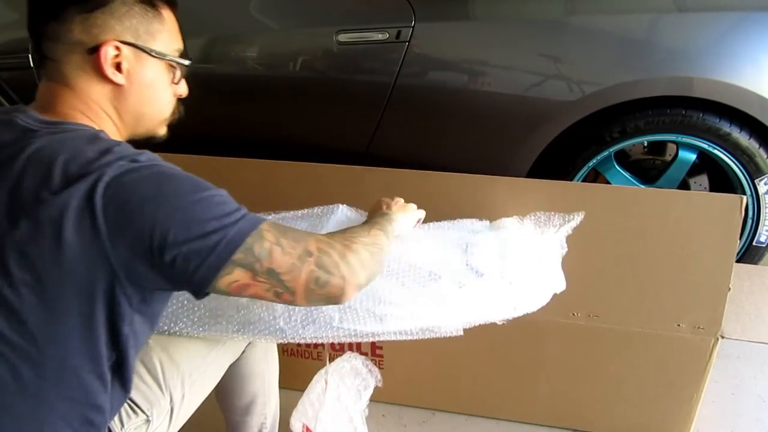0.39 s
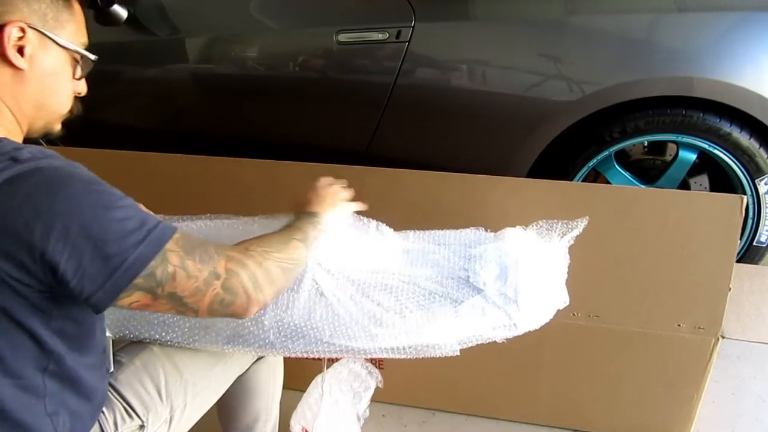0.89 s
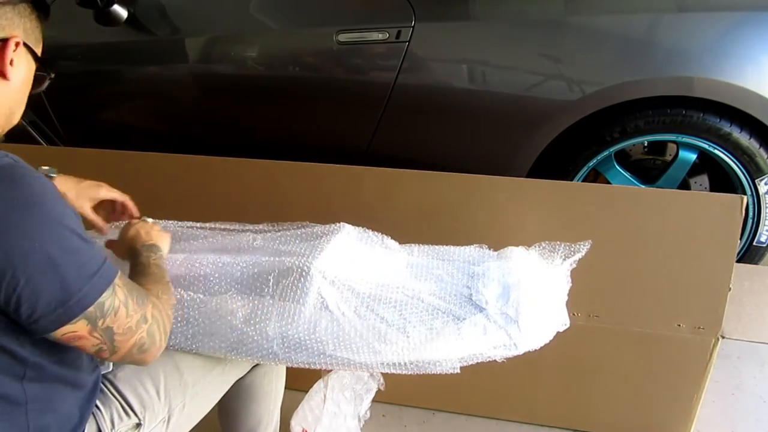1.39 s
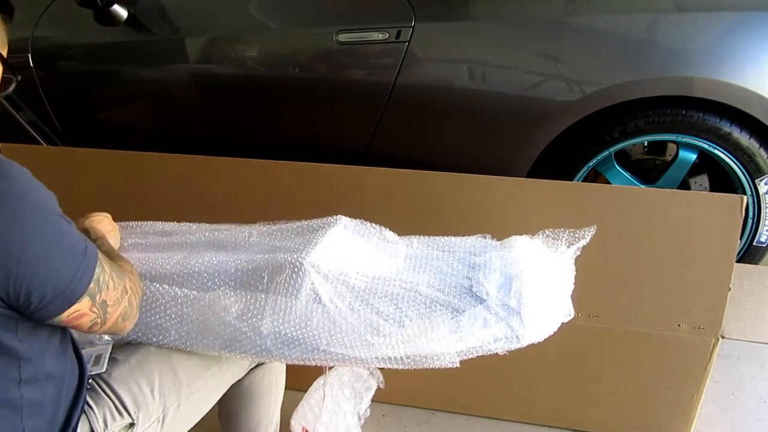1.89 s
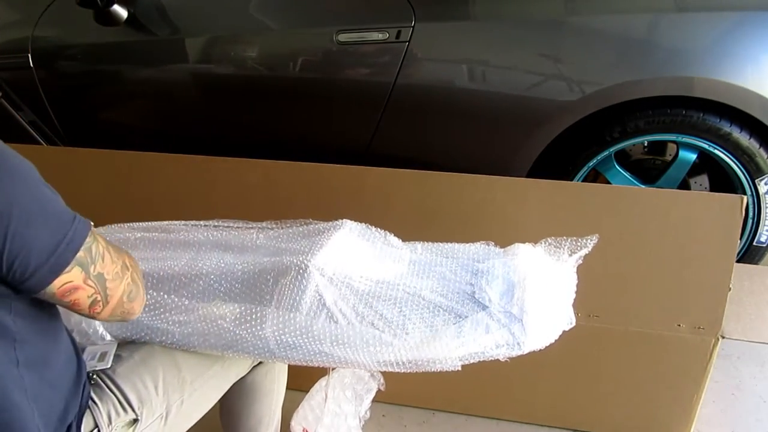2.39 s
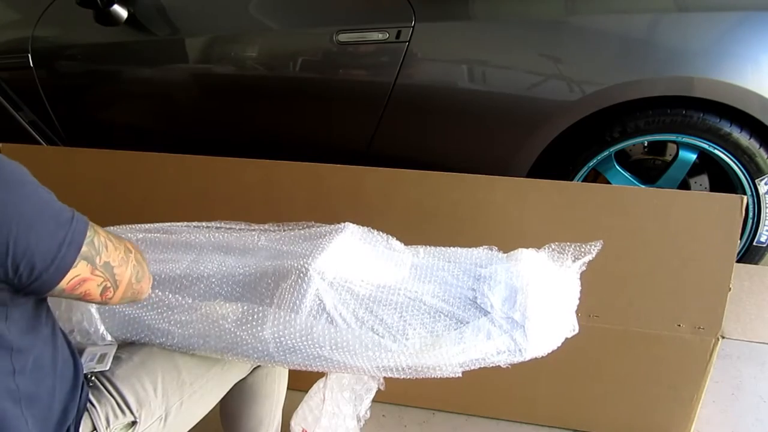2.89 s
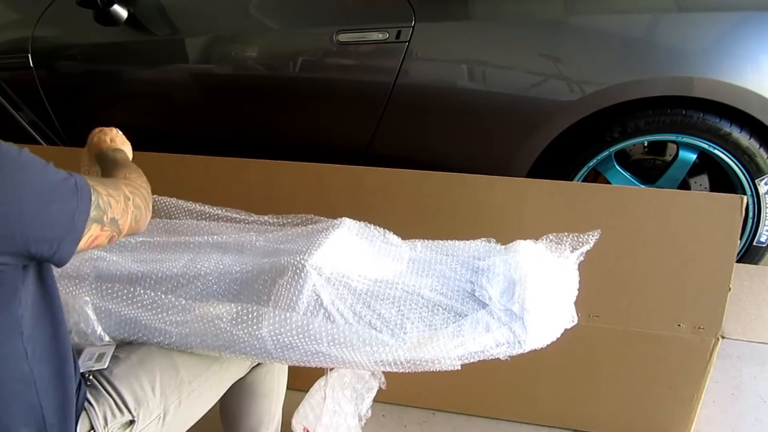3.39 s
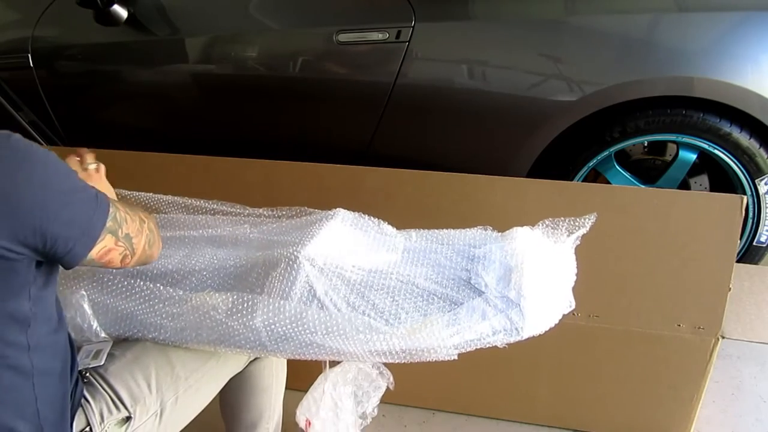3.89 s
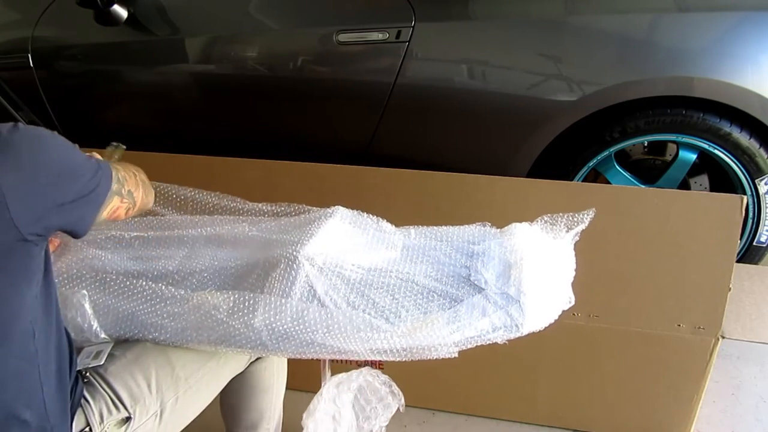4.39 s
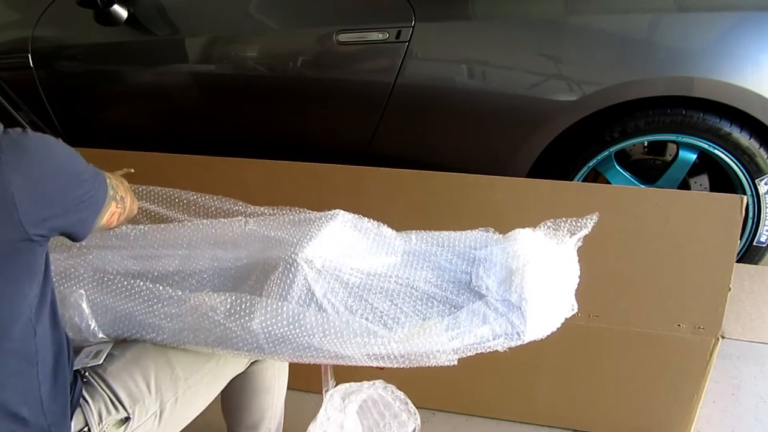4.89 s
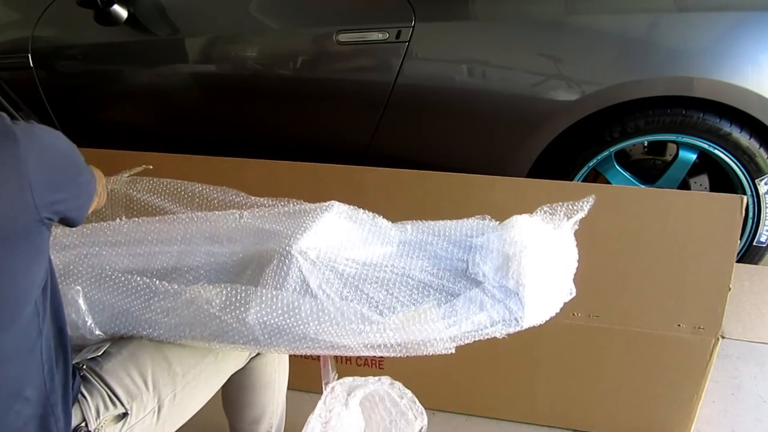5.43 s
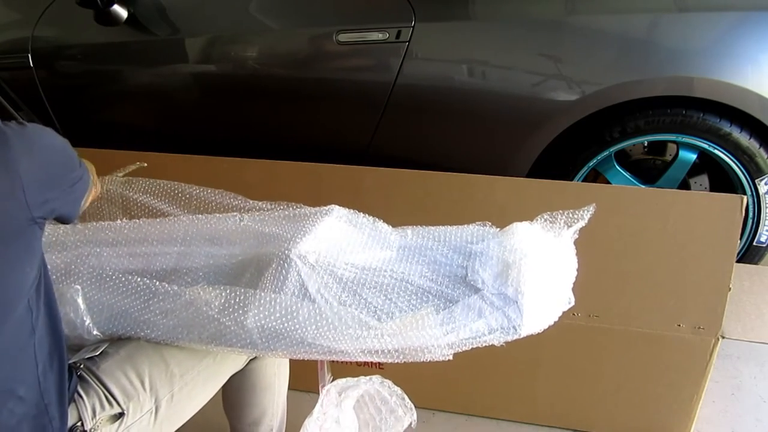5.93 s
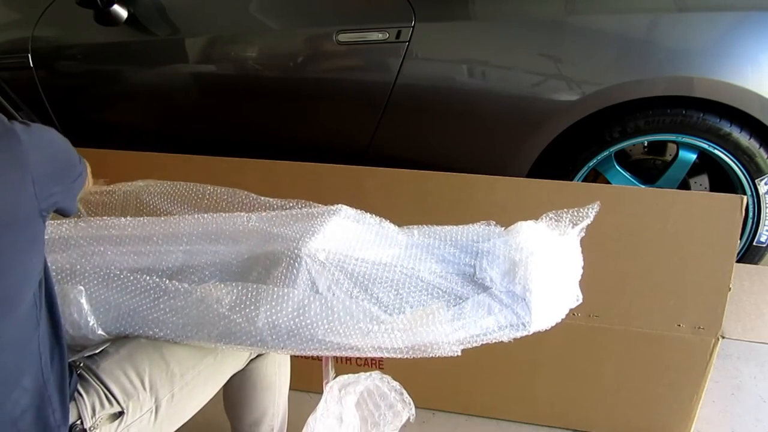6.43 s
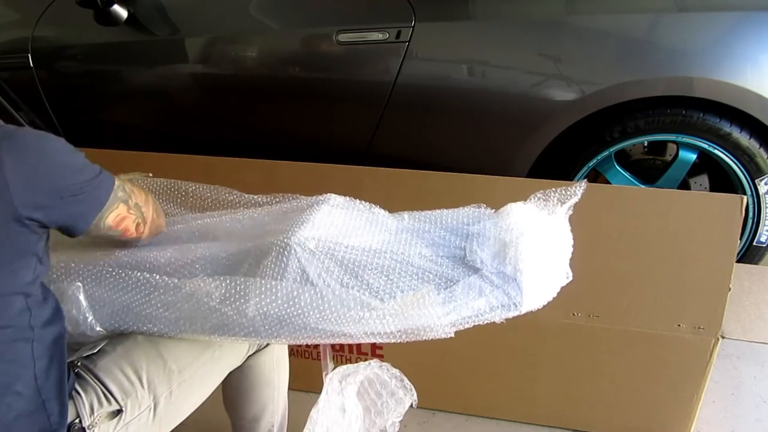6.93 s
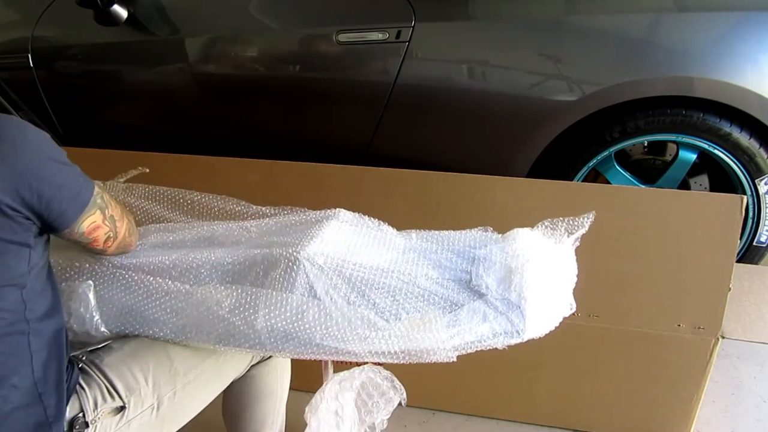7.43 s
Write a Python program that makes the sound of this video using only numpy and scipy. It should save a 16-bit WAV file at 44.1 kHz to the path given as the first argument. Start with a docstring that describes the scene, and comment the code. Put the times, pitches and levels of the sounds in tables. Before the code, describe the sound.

Plastic wrap rustles in light pulls, goes quieter, then hard tugs crack sharply and boom against a large hollow panel in a bare garage.

```python
"""Bubble wrap is pulled off a large hollow plastic part in a bare garage, over a faint rumble and low hum.
It starts with light pulls: swarms of tiny clicks from buckling folds, with a few snaps and bumps.
After a quieter spell, hard pulls near 3, 4.3, 5.2 and 6 to 6.5 s add loud snaps, booms and short creaks;
lighter pulls end it. Clicks ring at the pitch of their fold, the part rings in a few fixed notes,
and dense reflections let every sound die away in under half a second."""
import sys
import numpy as np
from scipy import signal
from scipy.fft import rfft, irfft, next_fast_len
from scipy.io import wavfile

SR = 44100
rng = np.random.default_rng(int(sys.argv[2]) if len(sys.argv) > 2 else 0)


def bounce(signal):
    """Save signal as a 16-bit WAV file at the path given by the first command-line argument."""
    frames = np.transpose(np.atleast_2d(signal))
    limited = np.clip(frames, -1, 1)
    pcm = np.round(limited * 32767).astype(np.int16)
    wavfile.write(sys.argv[1], SR, pcm)


def level_to_linear(level):
    """Convert decibel levels to linear amplitude factors, elementwise."""
    exponent = np.asarray(level, float) / 20
    return 10 ** exponent


N = 332955   # length in samples
HOP = 40   # samples between the points of a slow curve

# rumble from outside, only its tone colour: pitch_hz, level_per_hertz_db
RUMBLE_COLOUR = [(20, -3), (40, -8), (70, -1), (128, 0), (250, 0), (500, -5), (1500, -17.5), (5000, -18),
                 (15000, -58)]
# a low hum that comes and goes: time_s, rms_level_db
HUM_LEVEL = [(0, -75), (.25, -57), (1.22, -60), (1.45, -50), (1.75, -50), (2.0, -59), (3.7, -58),
             (4.2, -65), (7.55, -61)]
# how long the garage rings on: pitch_hz, time_to_fall_60_db_s
GARAGE_RING = [(200, 0.39), (600, 0.46), (1800, 0.34), (5000, 0.45), (12000, 0.26)]
# notes of the hollow part: pitch_hz, level_db, time_to_fall_60_db_s
PART_NOTES = [(252.5, -12, 0.098), (427, -11, 0.073), (640, -3.5, 0.016), (840, -14, 0.1),
              (1200, -17, 0.013), (1730, 4.5, 0.0048)]
# hand or film bumping the part: start_s, push_strength_db, hardness_0_to_1
BUMPS = [(0.471, -25.5, 0.9), (0.567, -34, 0.3), (0.826, -26, 0.48), (1.732, -26, 1), (3.118, -23, 0.61),
         (3.25, -22, 1), (3.694, -42, 0.55), (3.868, -17, 0.8), (3.951, -32, 0.3), (4.339, -12.5, 0.85),
         (4.415, -11, 0.45), (5.182, -5.5, 0.56), (5.614, -28.5, 0.56), (5.658, -24, 0.32),
         (6.028, -26.5, 0.57), (6.171, -12.5, 0.9), (6.447, -22, 0.12)]
# film sticking and slipping on the part: start_s, length_s, slips_per_s, strongest_slip_db
STICK_SLIPS = [(3.161, 0.11, 385, -21.5), (5.02, 0.057, 268, -24.5), (5.069, 0.015, 262, -21)]
# slack film shifting between strokes: time_s, rustle_rms_db, commonest_fold_hz
SLACK_FILM = [(0, -38, 1990), (.3, -51.5, 2200), (.38, -54, 2300), (.6, -39.5, 2220), (1.25, -38.5, 2820),
              (1.7, -42, 2130), (2.4, -43, 2180), (2.75, -48, 2295), (3.6, -52, 2140), (4.1, -49, 2210),
              (4.55, -38, 2167), (4.9, -46, 1992), (5.55, -45, 2504), (5.92, -47.5, 2210),
              (6.62, -41.5, 2500), (6.9, -40.5, 2820), (7.1, -40, 1996), (7.55, -43, 2620)]
# strokes of the hands: climb_start_s, climb_end_s, fall_start_s, level_at_climb_end_before_any_fall_db,
# commonest_fold_at_climb_end_hz
HAND_STROKES = [(0, 0.09, .19, -37, 3500), (.19, 0.218, 0.27, -36.5, 2180), (0.386, .47, .5, -31.5, 1920),
                (0.496, 0.536, 0.51, -36, 1920), (0.587, 0.675, 0.838, -35.5, 2630),
                (0.967, 1.136, 1.134, -33, 2270), (1.242, 1.326, 1.44, -35, 2020),
                (1.424, 1.48, 1.46, -31.5, 2200), (2.027, 2.064, 2.31, -39.5, 3460),
                (2.498, 2.53, 2.546, -42, 2000), (2.897, 3.07, 3.238, -21, 2310),
                (3.684, 3.766, 3.85, -45, 1910), (3.865, 3.859, 3.96, -40, 750),
                (4.226, 4.365, 4.435, -22.5, 1970), (4.518, 4.594, 4.67, -37, 3240),
                (4.861, 4.893, 4.98, -48, 1660), (5.085, 5.15, 5.243, -21, 1720),
                (5.42, 5.444, 5.49, -35.5, 2804), (5.604, 5.684, 5.69, -43.5, 1890),
                (5.956, 6.051, 6.16, -26, 1620), (6.143, 6.164, 6.215, -23, 1698),
                (6.34, 6.37, 6.21, -32, 2360), (6.4, 6.445, 6.49, -27, 1770), (6.683, 6.7, 6.61, -30, 4370),
                (7.17, 7.18, 7.23, -37, 2800), (7.368, 7.385, 6.2, -37, 4270),
                (7.49, 7.517, 7.6, -35, 1970)]
# tone colour of the buckling film, before it is tilted by the pull: pitch_hz, level_per_hertz_db
FILM_COLOUR = [(88, -43), (150, -18), (208, -2.5), (258, -4.5), (410, 0.5), (488, -7.5), (790, 2),
               (2520, -0.5), (8510, -6.5), (12800, -36), (15200, 10.5)]
# a fold snapping and the clicks it sets off, before the last filter:
# start_s, crack_peak_db, ring_hz, run_rms_relative_to_crack_db
FOLD_SNAPS = [(0.0166, -20, 1540, -16), (0.0613, -21, 2030, -17), (0.093, -24, 4050, -13),
              (0.1306, -18.5, 3390, -13), (0.1594, -17, 2720, -21), (0.2383, -16, 2980, -23),
              (0.2974, -26, 2310, -30), (0.4168, -20.5, 3470, -14.5), (0.443, -17, 1520, -12.5),
              (0.4759, -11.5, 5530, -14.5), (0.487, -11, 1630, -14), (0.5353, -14, 1530, -14),
              (0.6983, -20, 1530, -17.5), (0.7722, -13, 7900, -15), (0.8234, -22, 1970, -18),
              (0.8921, -18, 1770, -23), (1.0036, -17.5, 1530, -14.5), (1.4018, -17.5, 1630, -16),
              (1.736, -21.5, 1230, -17), (1.7854, -26, 4000, -11), (1.8728, -24, 1290, -15),
              (2.1029, -19, 3250, -13), (2.14, -27, 3180, -22), (2.2822, -19, 5400, -16),
              (2.5357, -23.5, 1720, -14), (2.833, -14.5, 3300, -14), (2.8894, -15, 6620, -14.5),
              (2.9114, -7.5, 4520, -15.5), (2.9473, -6.5, 5350, -16.5), (2.9896, -4.5, 1890, -14),
              (3.048, -14, 1730, -16), (3.1194, -5.5, 1880, -11.5), (3.2444, -2.5, 2480, -16),
              (3.697, -24.5, 1280, -15), (3.7663, -23, 1920, -17), (3.9493, -25, 1340, -20),
              (4.2153, -14.5, 2340, -18), (4.2453, -11, 1970, -18), (4.2941, -15.5, 1970, -17.5),
              (4.3181, -4.5, 2520, -22.5), (4.3405, -1.5, 1310, -16.5), (4.4123, -4.5, 2660, -26),
              (4.6118, -19, 6700, -17), (4.6485, -12, 7300, -18), (5.1227, -11.5, 1390, -14),
              (5.1529, -3.5, 2230, -15.5), (5.1664, -6, 1600, -14), (5.1824, -8.5, 1130, -13),
              (5.4493, -23, 2970, -12), (5.66, -18.5, 1232, -14.5), (5.9848, -19.5, 1356, -15),
              (6.0297, -10.5, 1590, -14.5), (6.0542, -10, 1820, -14.5), (6.0892, -2, 1360, -16.5),
              (6.1708, -3, 1245, -18), (6.185, 0, 1240, -16.5), (6.3763, -12, 1620, -16.5),
              (6.4258, -13.5, 2796, -14.5), (6.4468, -4.5, 1660, -14.5), (6.7077, -9, 7274, -16),
              (6.7196, -12, 4300, -12.5), (6.7339, -12.5, 4250, -12), (6.9416, -28, 2441, -16),
              (7.1761, -19.5, 2760, -15), (7.1934, -19, 1690, -15), (7.3839, -24, 6009, -14),
              (7.5087, -21.5, 1360, -17)]

RUMBLE_DB = -53
HUM_HZ, HUM_RING_S = 127.3, 1.35 / 8.9   # pitch; time to fall 60 dB
SHAKE_DB = -26   # extra hum relative to the film, when a stroke shakes the part
GARAGE_DB = 0   # level of the reflections
JERK_DB = -5.5   # first jerk of the wall relative to the push
BUILD_DB, LET_GO_DB_PER_S = 18, 360   # climb from its start to its end; speed of the fall
SAG_OCTAVES_PER_S = 1.1   # folds grow coarser as a stroke goes on
USUAL_FOLD_HZ, USUAL_DB = 2300, -35   # the pull at which the tilts below start from their plain values
# coarse folds relative to the film colour; change per octave of commonest pitch; change per dB of effort
COARSE_DB, COARSE_DB_PER_OCTAVE, COARSE_FOLLOWS = 1, -8.5, 0.017
FINE_DB, FINE_DB_PER_OCTAVE, FINE_FOLLOWS = 3, -2.5, 0.018   # the same for fine folds
TAUT_SNAPS_PER_S, TAUT_DB = 50, -27   # chances for a snap; film level above which one happens
# crack relative to film; run relative to crack; spread of loudness and of pitch, either way
TAUT_CRACK_DB, TAUT_RUN_DB, TAUT_SPREAD_DB, TAUT_SPREAD_OCTAVES = 9, -11.5, 6, 0.47
RINGING_HZ, RUN_CYCLES = 5330, 11   # smaller folds ring clearer, fully from this pitch up; length of the ring


def rms_one(x):
    """Scale to rms 1."""
    return x / np.sqrt(np.mean(x ** 2) + 1e-20)


def in_time(rows):
    """Turn a table into curves, one value every HOP samples."""
    s, *columns = np.transpose(rows)
    return [np.interp(np.arange(0, N, HOP) / SR, s, column) for column in columns]


def fill(slow):
    """Go from one value every HOP samples to one a sample."""
    return np.interp(np.arange(N) / HOP, np.arange(len(slow)), slow)


def at_hz(points, hz):
    """Read a table on a log-frequency axis, because pitch is heard in ratios."""
    table = np.array(points)
    return np.interp(np.log(hz), np.log(table[:, 0]), table[:, 1])


def coloured(x, spectrum):
    """Give white noise the tone colour of a table, at rms 1."""
    hz = np.maximum(np.arange(len(x) // 2 + 1) * SR / len(x), 1)
    return rms_one(irfft(rfft(x) * level_to_linear(at_hz(spectrum, hz)), len(x)))


def drift(rate):
    """Slow random wandering around 0, rms 1, one value every HOP samples; rate in Hz."""
    r = np.exp(-2 * np.pi * HOP * rate / SR)
    noise = rng.standard_normal(len(range(0, N, HOP)) + 2000)
    return rms_one(signal.lfilter([1], [1, -2 * r, r * r], noise)[2000:])   # skip the settling


def ring(clicks, hz, t60):
    """A resonance: each unit click starts a cosine of height 1 that falls 60 dB in t60 seconds."""
    r, w = level_to_linear(-60 / (t60 * SR)), 2 * np.pi * hz / SR
    return signal.lfilter([1, -r * np.cos(w)], [1, -2 * r * np.cos(w), r * r], clicks + 1e-18)


def rumble():
    """Steady noise from outside, strongest in the lows."""
    noise = rng.standard_normal(next_fast_len(N))
    return level_to_linear(RUMBLE_DB) * coloured(noise, RUMBLE_COLOUR)[:N]


def hum(film_db):
    """Noise through a narrow resonance makes a wavering low note, stronger when strokes shake the part."""
    note = ring(rng.standard_normal(N), HUM_HZ, HUM_RING_S)
    level = np.hypot(level_to_linear(in_time(HUM_LEVEL)[0]), level_to_linear(film_db + SHAKE_DB))
    return fill(level) * rms_one(note)


def garage(x):
    """Dense reflections dying octave by octave; film sounds from ever new spots, each with its own pattern."""
    t, step, size = np.arange(SR * 6 // 10) / SR, 1024, 30000
    noise, tails = rng.standard_normal((2, 24, len(t))), 0   # 24 spots
    for k, low in enumerate(60 * 2 ** np.arange(8)):
        band = signal.butter(2, [low, min(2 * low, .45 * SR)], "band", fs=SR, output="sos")
        octave = signal.sosfilt(band, noise[k % 2])
        decay = level_to_linear(-60 * t / at_hz(GARAGE_RING, 1.16 * low))
        tails = tails + octave * decay * np.clip((t - .002) / 0.0034, 0, 1)   # first reflections after 2 ms
    spots = rfft(tails / np.sqrt(np.sum(tails ** 2, axis=1))[:, None], size)
    padded, out = np.pad(x, (step, 2 * step)), np.zeros(N + 2 * size)
    for i in range(0, N + step, step):
        piece = padded[i:i + 2 * step] * np.hanning(2 * step)   # overlapping pieces, one spot each
        out[i:i + size] += irfft(rfft(piece, size) * spots[rng.integers(24)], size)
    return level_to_linear(GARAGE_DB) * out[step:step + N]


def part(pushes):
    """Pushes set the notes of the hollow part ringing, neighbours in opposite phase."""
    return sum(level_to_linear(db) * (-1) ** k * ring(pushes, hz, t60) for k, (hz, db, t60) in enumerate(PART_NOTES))


def knocks():
    """A harder bump is a shorter push and reaches higher notes; the wall's first jerk is heard directly."""
    pushes, jerks = np.zeros((2, N + 400))
    for s, db, hard in BUMPS:
        push = np.hanning(round(SR * 0.0034 * 0.093 ** np.clip(hard, 0, 1)) + 2)
        start = round(s * SR)
        pushes[start:][:len(push)] += level_to_linear(db) * push / push.sum()
        jerks[start:][:len(push)] += level_to_linear(db + JERK_DB) * rms_one(np.gradient(push))
    return part(pushes[:N]) - jerks[:N]


def creaks():
    """Soft slips come nearly evenly, swell and fade, so the part hums a short note."""
    slips = np.zeros(N)
    for start, length, per_s, db in STICK_SLIPS:
        t = np.arange(0, length, 1 / per_s)
        uneven = rng.normal(0, 8.8, 60)[:len(t)]   # samples early or late
        at = ((start + t) * SR + uneven).astype(int)
        slips[at] = level_to_linear(db) * np.sin(np.pi * t / length)
    softened = signal.lfilter([.1], [1, -.93], slips)
    return part(softened)


def pulling():
    """Each stroke climbs and falls, some falling before the climb ends, a few too early to be heard."""
    t, (slack_db, slack_hz) = np.arange(0, N, HOP) / SR, in_time(SLACK_FILM)
    power = level_to_linear(slack_db) ** 2
    octaves = power * np.log2(slack_hz)   # pitch weighted by power, so the loudest sets the commonest fold
    for climb_start, climb_end, fall_start, db, hz in HAND_STROKES:
        climb_db = BUILD_DB * np.clip((climb_end - t) / max(climb_end - climb_start, .002), 0, 5)
        fall_db = LET_GO_DB_PER_S * np.maximum(t - fall_start, 0)
        stroke = level_to_linear(db - climb_db - fall_db) ** 2
        sag = SAG_OCTAVES_PER_S * np.clip(t - climb_end, climb_start - climb_end, fall_start - climb_end)
        power = power + stroke
        octaves = octaves + stroke * (np.log2(hz) - sag)
    return 10 * np.log10(power), 2 ** (octaves / power)


def folds(film_db, common_hz, per_s, spread_db, clump_db, cycles, favour_db):
    """Folds of every size buckle at random, in clumps; each rings a few cycles at the pitch of its size."""
    shift, effort = np.log2(common_hz / USUAL_FOLD_HZ), film_db - USUAL_DB
    coarse_db = COARSE_DB + COARSE_DB_PER_OCTAVE * shift + COARSE_FOLLOWS * effort
    fine_db = FINE_DB + FINE_DB_PER_OCTAVE * shift + FINE_FOLLOWS * effort
    pitches = np.geomspace(200, 14000, 19)[:, None]
    coarse = np.clip(np.log2(1700 / pitches), 0, 1)
    fine = np.clip(np.log2(pitches / 3500), 0, 1)
    near_common = np.exp(-(np.log2(pitches / common_hz) / 0.78) ** 2)
    tilt_db = coarse * coarse_db + fine * fine_db + favour_db * near_common
    shares = np.sqrt(pitches) * level_to_linear(at_hz(FILM_COLOUR, pitches) + tilt_db)
    shares *= level_to_linear(film_db) / np.sqrt(np.sum(shares ** 2, axis=0))   # together they reach the film level
    clump, out = drift(41), np.zeros(N)
    for hz, share in zip(pitches[:, 0], shares):
        count = int(per_s * np.sqrt(hz / 1000) * N / SR)   # small folds are many
        place, size, side = rng.random((3, 12000))[:, :count]
        strength = level_to_linear(spread_db * np.minimum(-np.log(1 - size), 4.5))   # a few are much stronger
        clicks = np.zeros(N)
        clicks[(place * N).astype(int)] = strength * np.sign(side - .5)
        band = signal.butter(1, [hz / 1.44, min(hz * 1.345, .45 * SR)], "band", fs=SR, output="sos")
        swarm = rms_one(signal.sosfilt(band, ring(clicks, hz, cycles / hz)))
        clumping = level_to_linear(clump_db * (clump + 0.52 * drift(8.2)))   # shared flicker plus a slower one of its own
        out += swarm * fill(share * clumping)
    return out


def taut_snaps(film_db, common_hz):
    """While the film is taut, further folds snap at random, louder with a harder pull."""
    place, loud, size = rng.random((round(TAUT_SNAPS_PER_S * N / SR), 3)).T
    at = (place * len(film_db)).astype(int)
    crack_db = film_db[at] + TAUT_CRACK_DB + TAUT_SPREAD_DB * (2 * loud - 1)
    ring_hz = common_hz[at] * 2 ** (TAUT_SPREAD_OCTAVES * (2 * size - 1))
    rows = np.c_[at * HOP / SR, crack_db, ring_hz, np.full(len(at), TAUT_RUN_DB)]
    return rows[film_db[at] > TAUT_DB]


def snaps(rows):
    """A lone crack, then a dying run of uneven clicks, both coloured around the ring of the fold."""
    out, t = np.zeros(N + 3000), np.arange(3000) / SR
    for (s, crack_db, hz, run_db), noise in zip(rows, rng.standard_normal((150, 2, len(t)))):
        broad = signal.butter(1, [hz / 5.4, min(hz * 4.46, .4 * SR)], "band", fs=SR)
        crack = -(t == 0).astype(float) + 0.39 * noise[0] * np.exp(-t / 0.00059)
        crack = signal.lfilter(*broad, crack + 0.27 * ring(crack, hz, 3.8 / hz))
        # noise times squared noise is spiky, like separate clicks
        run = noise[0] * noise[1] ** 2 * np.exp(-t / 0.008) * np.minimum(t / 0.0018, 1)
        ringing = min(hz / RINGING_HZ, 1) * rms_one(ring(run, hz, RUN_CYCLES / hz))
        run = signal.lfilter(*broad, rms_one(run) + ringing)
        run = level_to_linear(run_db) * run / np.sqrt(np.mean(run[:400] ** 2))
        snap = crack / np.abs(crack).max() + run
        out[round(s * SR):][:len(t)] += level_to_linear(crack_db) * snap
    return signal.sosfilt(signal.butter(2, [400, 13000], "band", fs=SR, output="sos"), out[:N])


def scene():
    """The wrap and the part near the microphone, their room sound and the background."""
    film_db, common_hz = pulling()
    wrap = folds(film_db, common_hz, per_s=140, spread_db=3.5, clump_db=2.0, cycles=2.87, favour_db=5)
    wrap = wrap + snaps(np.r_[FOLD_SNAPS, taut_snaps(film_db, common_hz)])
    body = knocks() + creaks()
    room = garage(wrap + level_to_linear(-6.0) * body)
    mix = wrap + body + room + rumble() + hum(film_db)
    return np.tile(mix, (2, 1))


def top_cut(x):
    """Nothing passes above the cut-off."""
    return signal.sosfilt(signal.butter(12, 16340, fs=SR, output="sos"), x)


def record(dry):
    """One microphone on both channels; mainly the highest peaks are rounded, and the top is cut."""
    rounded = dry / (1 + (dry / .85) ** 4) ** .25   # never passes 0.85
    cut = signal.cheby2(12, 50, 15300, fs=SR, output="sos")   # 50 dB down from 15300 Hz up
    finished = signal.sosfilt(cut, rounded)
    return top_cut(finished)


dry = scene()
out = record(dry)
bounce(out)
```